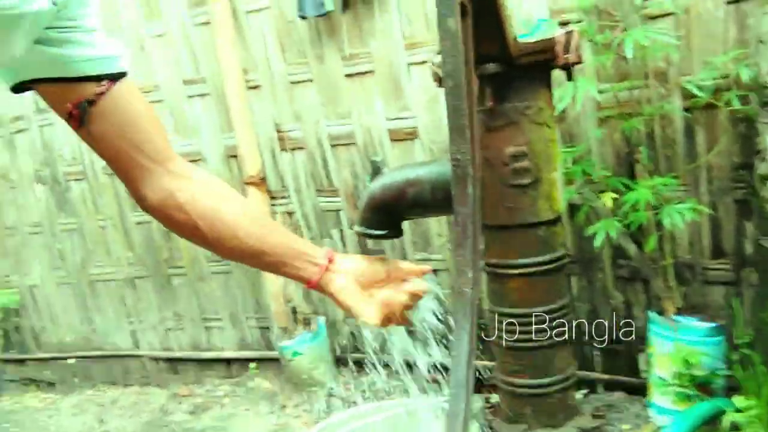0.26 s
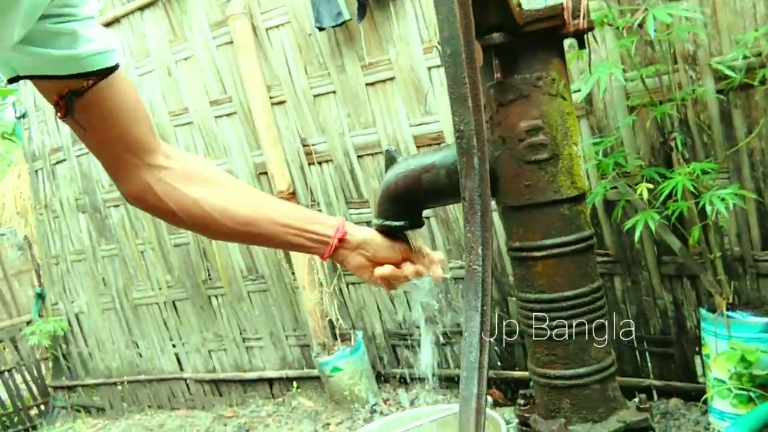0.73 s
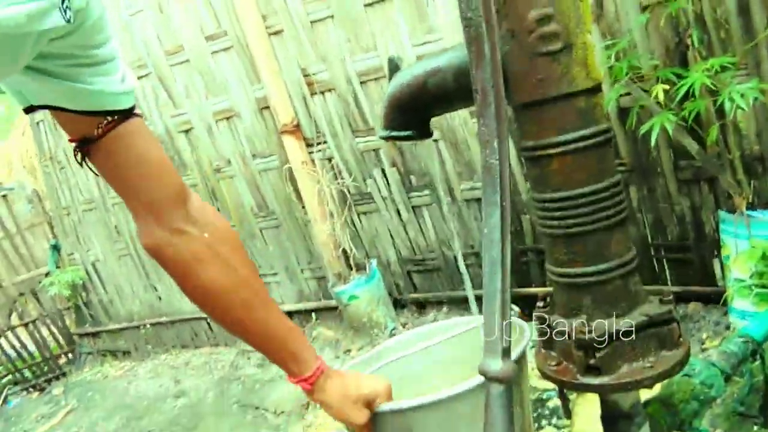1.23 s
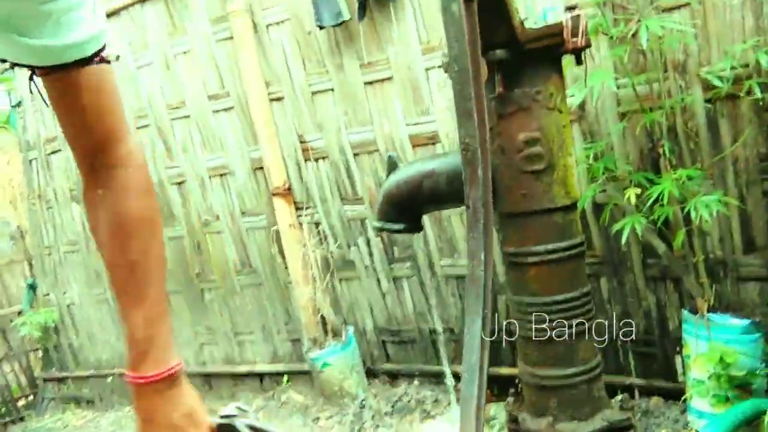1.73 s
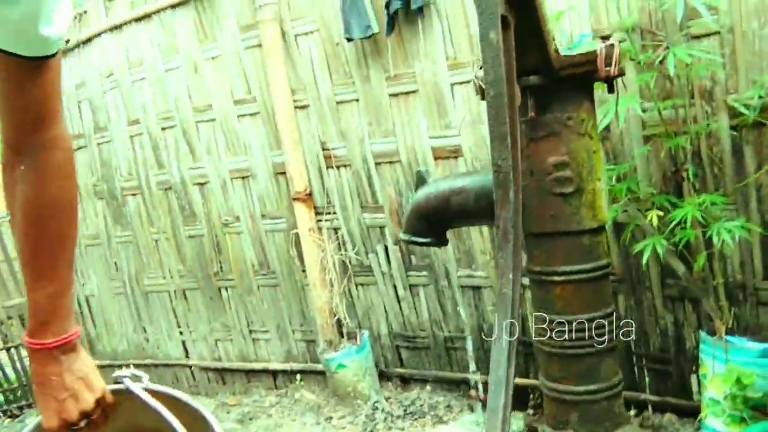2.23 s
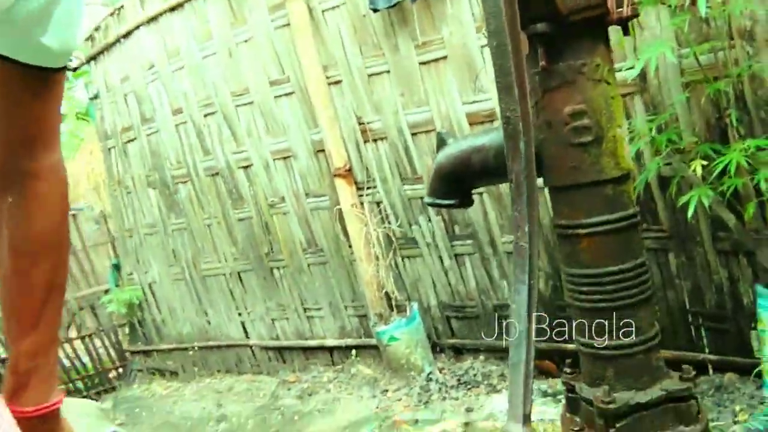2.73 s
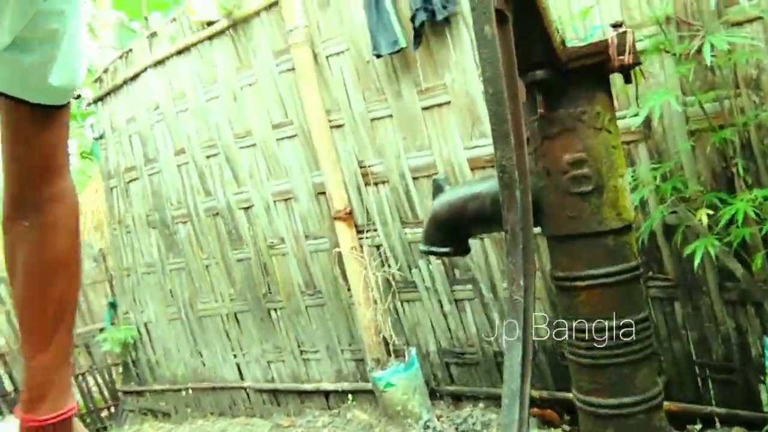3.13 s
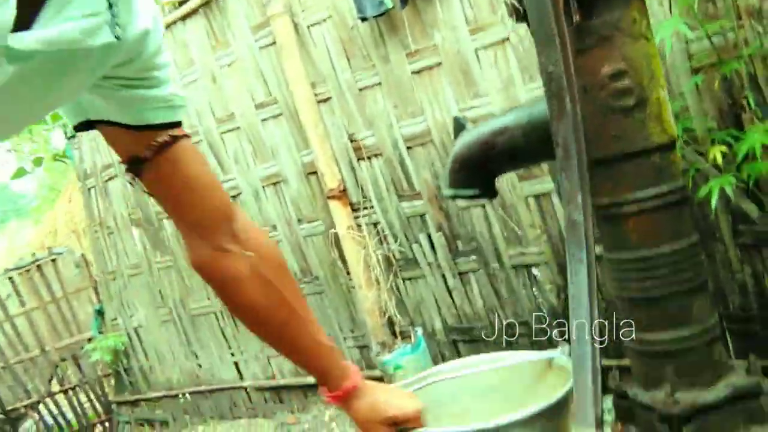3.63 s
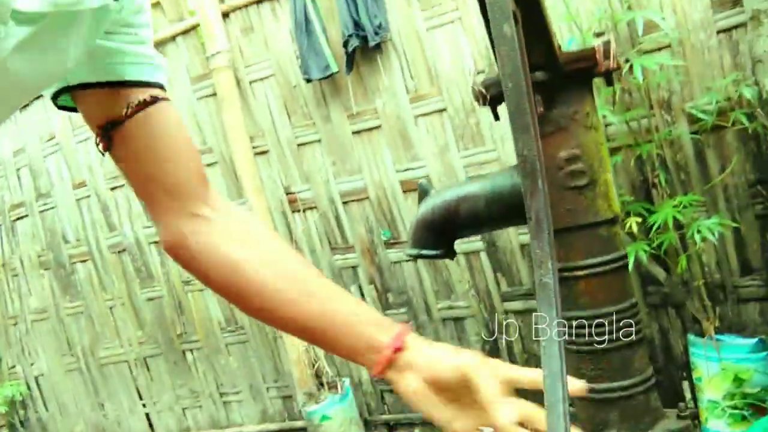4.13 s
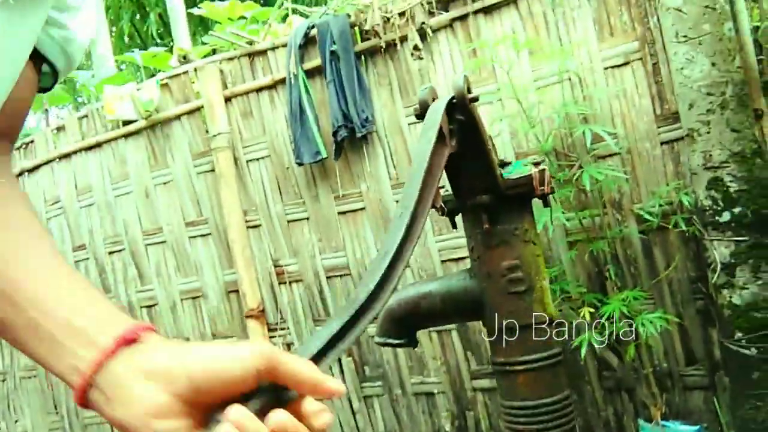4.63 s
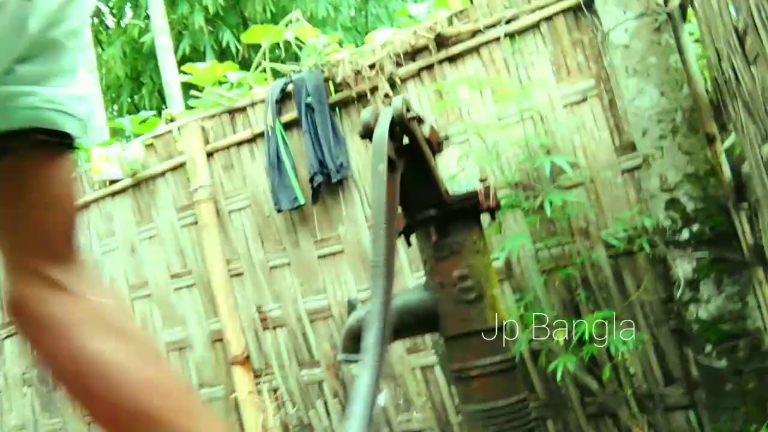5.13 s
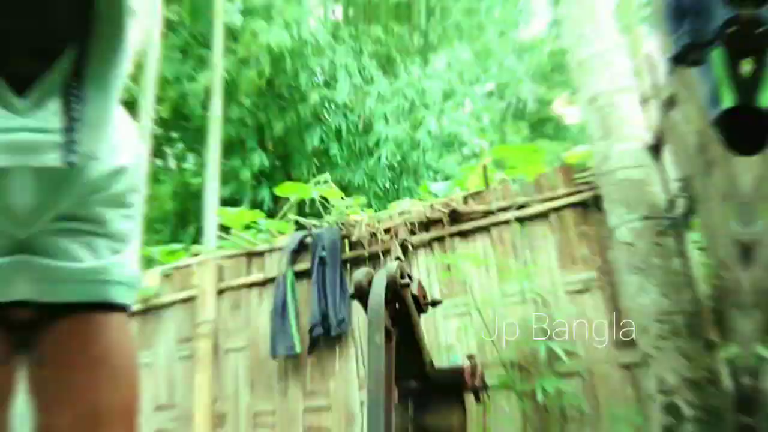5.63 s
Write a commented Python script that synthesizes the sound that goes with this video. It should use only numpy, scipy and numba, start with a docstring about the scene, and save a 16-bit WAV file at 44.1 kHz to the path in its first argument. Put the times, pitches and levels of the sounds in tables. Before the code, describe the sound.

Close up in a quiet yard, bright water splashes over a hand into a metal bucket, thins to a dribble, then is swilled and tipped out in two splashy throws. The bucket is set down with a dull thump. Loose iron clanks as a pump handle is worked, the barrel gulps with a hollow hoot, and water begins to run again.

```python
"""A yard with a cast-iron hand pump: water runs over a hand into a metal bucket, which is swilled, emptied
on the ground in two throws and set down. Then the handle is worked, the barrel gulps air and water, and
the spout starts to run again; near the end the level dips briefly. Water is a crowd of damped bubble sines,
the iron and the bucket are banks of decaying modes, and the gulps are a gliding hoot with pulsed noise.
Small drops and glugs, clouds of grains for slaps and rattle, faint reflections and yard noise join them."""
import sys
import numpy as np
from scipy import signal
from scipy.fft import rfft, irfft, next_fast_len
from scipy.io import wavfile
from numba import njit

SR = 44100
rng = np.random.default_rng(int(sys.argv[2]) if len(sys.argv) > 2 else 0)


def generate_wav(sig):
    """Save sig (samples, or channels by samples) to the path in sys.argv[1] as 16-bit PCM at SR."""
    pcm = np.round(np.clip(np.atleast_2d(sig).T, -1, 1) * 32767).astype(np.int16)
    wavfile.write(sys.argv[1], SR, pcm)


N = 258867
TIME = np.arange(N) / SR
BARREL_HZ = 386.8  # resonance of the air in the barrel


def undb(db):
    """Level to amplitude: 20 dB is a factor of ten."""
    return 10 ** (np.asarray(db) / 20)


def unit(x):
    """Normalise the mean power: scale to rms 1."""
    return x / np.sqrt(np.mean(x ** 2))


def add(out, start_s, x):
    """Superposition: mix x into out from start_s."""
    i = max(int(start_s * SR), 0)
    out[i:i + len(x)] += x[:N - i]


def colour(x, points):
    """Spectral shaping: weight x by (frequency_hz, level_db) points, joined on a log-frequency axis."""
    hz, db = np.transpose(points)
    size = next_fast_len(len(x) + 512)
    f = np.arange(size // 2 + 1) * SR / size
    gain = undb(np.interp(np.log(f + 1), np.log(hz), db))
    return irfft(rfft(x, size) * gain, size)[:len(x)]


def band(x, low_hz, high_hz, order=2):
    """Butterworth band-pass: a flat passband with smooth skirts."""
    high = min(high_hz, .48 * SR)
    low = min(low_hz, high / 2 ** (1 / 10))
    return signal.sosfilt(signal.butter(order, [low, high], "band", fs=SR, output="sos"), x)


def walk(rate_hz):
    """Slow random modulation: normal knots at rate_hz, joined by straight lines."""
    knots = rng.standard_normal(N // 20)
    return np.interp(TIME * rate_hz, np.arange(len(knots)), knots)


def envelope(t, swell_s, hold_s, sag_db_per_s, release_db_per_s):
    """Build-up and decay: swell from t = 0, hold while sagging, then die away exponentially."""
    age = t - swell_s
    sag = sag_db_per_s * np.clip(age, 0, hold_s)
    release = release_db_per_s * np.maximum(age - hold_s, 0)
    return np.clip(t / swell_s, 0, 1) * undb(-sag - release)


@njit
def bubbles(start_s, hz, cycles, size, rise):
    """Bubble resonance: damped sines that last so many cycles while their pitch rises by the fraction rise."""
    out = np.zeros(N)
    for k in range(len(start_s)):
        first, n = int(start_s[k] * SR), int(cycles[k] * SR / hz[k]) + 2
        w = 2 * np.pi * hz[k] / SR
        # a complex number turns and shrinks at each sample; glide speeds up its turning
        z, step, glide = size[k] + 0j, np.exp(1j * w - 6 / n), np.exp(1j * w * rise / n)
        for i in range(first, min(first + n, N)):
            z *= step
            step *= glide
            out[i] += z.imag
    return out


def spatter(count, cycles, spread_db, rise):
    """Random superposition: an even rain of bubbles; positive spread_db makes a few far louder."""
    when, pitch, life, loud, sign = rng.random((count, 5)).T
    hz = 250 + 16500 * pitch ** 2
    length = cycles * (.5 + life)
    # the power of hz balances the crowding of low pitches
    size = undb(-spread_db * np.log(1 - .995 * loud)) * np.sqrt(hz * np.sqrt(hz) / length)
    return unit(bubbles(when * N / SR, hz, length, size * np.sign(sign - .5), rise))


def plinks(count, low_hz, high_hz, cycles, spread_db, rise):
    """Pitched bubble resonance: sparse bubbles; small ones are commoner and ring more cycles."""
    when, pitch, life, loud = rng.random((count, 4)).T
    hz = low_hz * (high_hz / low_hz) ** np.sqrt(pitch)
    length = cycles * (.5 + life) * np.sqrt(hz / low_hz)
    size = undb(-spread_db * np.log(1 - .93 * loud)) * np.sqrt(np.sqrt(hz))
    return unit(bubbles(when * N / SR, hz, length, size, rise))


def clumps(count, decay_s, spread_db, steady):
    """Shot-noise modulation: each lump of water raises the splashing at once, then its power decays."""
    when, loud = rng.random((count, 2)).T
    kicks = np.zeros(N)
    kicks[(when * N).astype(int)] = undb(-spread_db * np.log(1 - .9 * loud))
    power = signal.lfilter([1], [1, -np.exp(-2 / (decay_s * SR))], kicks ** 2)
    return np.sqrt(abs(steady) + power / power.mean())


def flow():
    """Incoherent addition: the surges' powers sum to the gains of splash, spray, slosh and ringing pool."""
    # surges in turn: spout over the hand, thin stream, bucket swilled, two throws, set down, pump worked:
    # start_s, swell_s, hold_s, drain_db_per_s, splash_db, spray_db, slosh_db, ringing_db (against the splash)
    pour_rows = [(0, 0.0013, .13, 62, -21.5, -35.5, -40.5, -5.5),
                 (0.127, 0.041, 0.29, 80, -21.5, -35.5, -36.5, -7),
                 (0.525, 0.041, 0.2, 55, -26, -39.5, -39.5, -3.5),
                 (.88, .04, 0.18, 18.5, -33, -47.5, -57, -4), (1.07, 0.039, 0.23, 62, -38.5, -64, -42, -4),
                 (1.249, 0.019, 0.073, 148, -27, -53, -37.5, -1.5),
                 (1.594, 0.038, 0.19, 65, -37.5, -51, -40.5, -4.5),
                 (1.858, 0.026, 0.21, 97, -27, -37.5, -38.5, -9),
                 (1.999, 0.018, 0.38, 130, -22, -31, -33.5, -17),
                 (2.466, 0.036, 0.14, 49, -39.5, -45, -38.5, -5.5),
                 (2.783, .13, 0.38, 123, -21.5, -31.5, -32, -12),
                 (3.591, 0.027, 0.069, 125, -41, -49, -49, -18),
                 (3.811, 0.055, 0.059, 132, -36, -57, -37, -16),
                 (4.322, 0.033, 0.18, 107, -38, -59.5, -41, -7),
                 (4.705, .03, 0.25, 128, -37, -61, -45.5, -7), (5.092, .03, 0.13, 92, -47.5, -62, -52, -5),
                 (5.326, 0.081, 0.08, 69, -28.5, -42.5, -43.5, -5.5)]
    sag_db_per_s = 6.5  # a surge weakens while it holds
    power = 1e-18  # keeps the gain ratios finite in silence
    for start_s, swell_s, hold_s, drain, splash_db, spray_db, slosh_db, ringing_db in pour_rows:
        surge = envelope(TIME - start_s, swell_s, hold_s, sag_db_per_s, drain)
        gains = undb([splash_db, spray_db, slosh_db, splash_db + ringing_db])
        power = power + np.outer(gains, surge) ** 2
    return np.sqrt(power)


def water():
    """Bubble noise in lumps: slosh, splash and spray are the large, middle and small bubble sizes."""
    # spectrum of the splashing: frequency_hz, level_db
    splash_spectrum = [(150, -0.5), (300, -12), (500, -14), (900, -0.5), (1500, -3), (2200, 0.5), (3300, 3),
                       (5000, -0.5), (7500, -1.5), (9000, 2.5), (11000, -12.5), (15500, -22)]
    splash_gain, spray_gain, slosh_gain, pool_gain = flow()

    crackle = spatter(count=60000, cycles=4.5, spread_db=-0.5, rise=0.)
    ringing = spatter(count=12000, cycles=71, spread_db=4.0, rise=0.068)
    lumps = clumps(count=900, decay_s=0.013, spread_db=3, steady=0.32)
    grains = colour((crackle + undb(-4.5) * ringing) * lumps, splash_spectrum)
    gurgle = plinks(count=800, low_hz=260, high_hz=1500, cycles=17, spread_db=4.5, rise=.2)
    pool = plinks(count=1200, low_hz=1300, high_hz=9000, cycles=34, spread_db=5.5, rise=.1)

    gurgle_gain = .75 * np.sqrt(pool_gain / splash_gain)  # more gurgle where the water rings more
    slosh = .8 * unit(band(grains, 190, 1400, order=3)) + gurgle_gain * band(gurgle, 170, 4000)
    splash = unit(band(grains, 1312, 8380, order=6))
    spray = unit(band(grains, 10210, 16200, order=5))
    # lone droplets snap on metal and stone
    ticks = unit(band(spatter(count=500, cycles=6, spread_db=3.4, rise=0.), 6500, 16200, order=2))
    fine = spray + undb(-4) * ticks
    return slosh * slosh_gain + splash * splash_gain + pool * pool_gain + fine * spray_gain


def slaps_and_rattle():
    """Impulsive grain noise: slaps of water, and the knocked bucket's rattle, are short, dense clouds."""
    # slaps of water and rattles of the knocked bucket: start_s, level_db, centre_hz, length_s
    slap_rows = [(0.182, -20.5, 4000, 0.0098), (0.203, -12.5, 5840, 0.0061), (0.356, -20, 3900, 0.058),
                 (0.373, -6, 14000, 0.0015), (0.574, -17.5, 6600, 0.0062), (.617, -17, 3460, 0.0086),
                 (0.669, -21, 3300, 0.02), (0.72, -14, 3540, 0.0059), (0.811, -14.5, 2580, 0.0069),
                 (.848, -16.5, 4740, 0.0081), (.991, -13.5, 5470, 0.0057), (1.045, -20.5, 11500, .003),
                 (1.066, -15.5, 2200, .0076), (1.189, -22, 2950, 0.0083), (1.267, -12, 4240, 0.022),
                 (1.349, -21.5, 1600, 0.019), (1.448, -18, 6300, 0.013), (1.826, -14, 4500, 0.014),
                 (1.917, -19.5, 2930, .013), (2.021, -17.5, 7000, 0.014), (2.147, -18.5, 2480, 0.014),
                 (2.155, -9.5, 2610, 0.0062), (2.383, -13, 1520, 0.0064), (2.386, -21, 3040, 0.017),
                 (2.619, -27, 3970, 0.026), (2.908, -12, 4150, 0.0038), (3.247, -15, 2880, .015),
                 (3.360, -9, 4100, 0.028), (3.388, -18, 4000, 0.02), (3.408, -17.5, 3900, 0.0095),
                 (3.47, -24.5, 4070, 0.026), (3.604, -28, 2130, 0.017), (3.686, -18, 2480, 0.0092),
                 (3.884, -17.5, 3330, .02), (3.903, -15.5, 3650, 0.016), (3.955, -27, 12000, 0.0045),
                 (5.311, -17.5, 1870, 0.022)]
    out, t = np.zeros(N), TIME[:SR // 6]
    cloud_spectrum = [(250, -9), (700, 5.5), (1500, 6.5), (4000, 6), (8000, 7.5), (10000, -2.0), (16000, -5.0)]
    cloud = colour(spatter(count=30000, cycles=15.5, spread_db=-1.0, rise=0.017), cloud_spectrum)
    for start_s, level_db, centre_hz, length_s in slap_rows:
        i = int(start_s * SR)
        attack = 1 - np.exp(-t / 0.00097)
        shape = attack * (np.exp(-(t / length_s) ** 2.1) + 0.17 * np.exp(-t / 0.034))
        burst = band(cloud[i:i + len(t)], centre_hz / 1.45, centre_hz * 1.27, order=1) * shape
        add(out, start_s, undb(level_db) * burst * np.std(shape) / np.std(burst))
    return out


def spell(start_s, end_s, level_db, bubble_hz, count):
    """Jittered timing: small drops and bubbles of scattered size, rows of start_s, level_db, bubble_hz."""
    when, loud, pitch = rng.random((count, 3)).T
    times = start_s + (end_s - start_s) * (np.arange(count) + when) / count
    return np.transpose([times, level_db + 6 * (loud - .5), bubble_hz * 2 ** (.5 * (pitch - .5))])


def drops_and_small_glugs():
    """Bubble resonance with a noise onset: each drop or small glug is a tick and a bubble of rising pitch."""
    # single drops and small rising glugs that stand out: start_s, level_db, bubble_hz (at the start)
    drop_rows = [(1.64, -19.5, 1500), (1.693, -16, 1470), (1.742, -17.5, 1330), (1.768, -17, 1650),
                 (1.792, -21.5, 1060), (2.471, -23, 2020), (2.586, -41, 1770), (2.684, -25.5, 1960),
                 (3.548, -30, 1670), (3.59, -25.5, 1640), (3.778, -29.5, 1364), (3.816, -28, 1380),
                 (4.039, -33.5, 1010), (4.085, -31, 1410), (4.108, -31, 1360), (4.336, -28, 1420),
                 (5.22, -28, 1500), (5.263, -28, 1390), (5.295, -29, 1640), (5.708, -33.5, 1060)]
    # spells of small drops and bubbles as water is swilled or dribbles:
    # start_s, end_s, level_db, bubble_hz (the centre of the scatter)
    spell_rows = [(1.611, 1.881, -26, 1380), (2.451, 2.81, -24.5, 1520), (3.457, 3.868, -35.5, 1430)]
    tick_db = -2.5  # against the bubble's level
    out, t = np.zeros(N), TIME[:SR // 20]
    drops = np.vstack([drop_rows] + [spell(*row, count=11) for row in spell_rows])
    for start_s, level_db, hz in drops:
        tick = unit(band(rng.standard_normal(len(t)), hz / 2, hz * 2.3, order=2))
        add(out, start_s, undb(level_db + tick_db) * tick * np.exp(-t / 0.0055))
    start_s, level_db, hz = drops.T.copy()
    return out + bubbles(start_s, hz, np.full(len(hz), 28.), undb(level_db), 0.35)


def big_bubbles():
    """Large-bubble resonance: a rising pitch, mostly in the bucket, once as water hits the ground."""
    # big bubbles: start_s, pitch_hz (at the start), level_db (before the band-pass)
    bubble_rows = [(0.676, 328, -30.5), (.682, 813, -20), (0.706, 337, -33), (.772, 830, -22.5),
                   (.817, 635, -31), (.87, 674, -27.5), (1.069, 238, -29), (1.084, 400, -29),
                   (1.098, 566, -28), (1.234, 310, -28.5), (1.277, 643, -31), (1.345, 302, -28),
                   (1.357, 800, -23.5), (1.722, 616, -21.5), (1.743, 1120, -20), (2.146, 255, -32)]
    start_s, hz, level_db = np.array(bubble_rows, float).T.copy()
    return band(bubbles(start_s, hz, np.full(len(hz), 28.), undb(level_db), 0.47), 150, 2500)


def handle():
    """Modal impact: loose iron chatters at each knock, rings, grates, and shakes the air in the barrel."""
    # knocks of the handle: start_s, level_db, centre_hz, length_s (of the chatter), rod_db (against the
    # pivot), boom_db (of the barrel's air), sing_hz (the mode left singing)
    clank_rows = [(4.289, -19, 5030, 0.013, -4.5, -49.5, 4990), (4.349, -30, 5500, 0.013, -9, -47, 4840),
                  (4.369, -16, 5300, 0.027, -10, -20, 4990), (4.406, -16.5, 3820, 0.026, -5, -14, 4990),
                  (4.528, -27.5, 3120, 0.0079, -9, -24, 4480), (4.558, -18.5, 3950, 0.015, 7, -41, 4480),
                  (4.564, -13, 5060, 0.016, -6.5, -42, 4840), (4.643, -29, 3800, 0.011, -1, -50, 3806),
                  (4.654, -15.5, 6100, 0.026, -18, -28, 6308), (4.692, -11.5, 6140, 0.01, -14, -41, 4840),
                  (4.709, -15, 4000, 0.017, 3, -25, 3533), (4.783, -19.5, 3140, 0.007, -6, -10, 4690),
                  (5.074, -31, 5650, 0.025, -8, -32, 4990), (5.110, -24, 7400, 0.013, -5.5, -35, 6308),
                  (5.128, -24, 4650, 0.017, 0, -49, 4990), (5.145, -17.5, 5370, 0.031, 3, -24, 3533),
                  (5.192, -26, 3700, 0.0088, -2, -29, 2425), (5.313, -30, 3500, .032, 5, -10, 3533),
                  (5.351, -17, 4460, 0.025, 6, -44, 2753), (5.457, -18.5, 3770, 0.021, -3, -14.5, 3533)]
    # modes of the handle and its pivot: frequency_hz, level_db, t60_s
    pivot_modes = [(1543, -5, 0.086), (2166, -6.5, 0.13), (2440, -7.5, 0.16), (2977, -4.5, .1),
                   (3603, -9, 0.062), (4160, -9, 0.21), (4420, 3.5, 0.04), (4620, -4, 0.09),
                   (4790, -4.5, 0.13), (5400, -10.5, 0.16), (5900, -9.5, 0.11), (6310, 1, 0.061),
                   (7190, -4.5, 0.076), (7370, -9, 0.17), (8240, -8, 0.18), (8970, -13, 0.19),
                   (8760, -13, 0.055), (9850, -12, 0.13), (10600, -11, 0.1), (11400, -15, 0.13),
                   (12200, -18, .07)]
    # modes of the piston rod and barrel head: frequency_hz, level_db, t60_s
    rod_modes = [(1140, -0.5, 0.24), (2410, -6.5, 0.2), (2760, -4.5, 0.22), (3500, 5, 0.096),
                 (3780, -4, 0.2), (4060, -13.5, 0.072), (4630, -15, 0.12), (4940, -3, 0.25),
                 (5460, -7.5, 0.16), (5780, -8.5, 0.25), (6880, -3.5, 0.12), (7300, -14, 0.11),
                 (7600, -6, .12), (9220, -3.5, .09), (10100, -15, 0.15)]
    out, t = np.zeros(N), TIME[:SR // 3]
    hz, mode_db, t60 = np.transpose(pivot_modes + rod_modes)[:, :, None]
    is_rod = (np.arange(len(hz)) >= len(pivot_modes))[:, None]
    attack = 1 - np.exp(-t / .001)
    for start_s, level_db, centre_hz, length_s, rod_db, boom_db, sing_hz in clank_rows:
        strength, detune, phase = rng.standard_normal((3, len(hz), 1))
        # where the blow lands decides which modes speak; the load on the joint shifts them slightly
        distance_db = 4 * np.log2(hz / centre_hz) ** 2
        weight = undb(mode_db + rod_db * is_rod - distance_db + 3 * strength)
        pitch = hz * (1 + .002 * detune)
        modes = np.sin(2 * np.pi * (pitch * t + phase)) * np.exp(-np.log(1000) * t / t60)

        # chatter feeds each mode unevenly; then the parts press together and choke the ring
        chatter = unit(band(rng.standard_normal(modes.shape), 25, 220, order=1))
        growth = np.exp(np.minimum(t, length_s) / .03)
        feed = np.exp(-(t / (1.2 * length_s)) ** 4) * (growth + .45 * chatter)
        tone = (weight * modes * (.6 + feed)).sum(0)
        tone /= np.sqrt(np.mean(tone[:int(length_s * SR)] ** 2))

        contact = np.exp(-(t / length_s) ** 4) + .06 * np.exp(-t / 0.041)
        rub = band(rng.standard_normal(len(t)), centre_hz / 4.04, centre_hz * 1.37, order=2)
        grate = unit(rub) * contact
        # the one mode that the joint does not choke
        sing = undb(-7) * np.sin(2 * np.pi * sing_hz * t) * np.exp(-t / 0.023)
        iron = tone + sing + grate * undb(-9.5)

        boom = np.sin(2 * np.pi * BARREL_HZ * (1 + 0.05 * detune[0]) * t)
        boom = boom * (1 - np.exp(-(t / 0.012) ** 2)) * np.exp(-t / 0.012)
        add(out, start_s, undb(level_db) * iron * attack + undb(boom_db) * boom)
    return out


def gulp():
    """Cavity resonance: air sucked past the wet piston hoots, beats with the barrel and sputters each cycle."""
    # gulps: start_s, swell_s, hold_s, pitch_hz (at the start), glide_hz_per_s, hoot_db, sputter_db
    gulp_rows = [(4.724, 0.016, 0.016, 366, -600, -27, -29),
                 (4.79, 0.021, 0.099, 339, 1000.5, -12.5, -19.5),
                 (4.971, 0.0181, 0.0057, 465, -4200, -14, -20)]
    sag_db_per_s, release_db_per_s = 10, 801
    flood_s = 0.073  # water fills the cavity: the hoot chokes and the sputter takes over
    overtone_db = [-9, -11, -9, -14, -14]  # second harmonic upwards
    hiss_spectrum = [(400, -21.5), (1050, -0.5), (1330, -8.0), (1560, 3.5), (1850, -3), (3400, 3),
                     (5000, -6), (8000, -10.5), (10000, -28.5), (16000, -45)]
    out, t = np.zeros(N), TIME[:SR // 4]

    def waver(rate_hz):
        """Random modulation over one gulp."""
        return walk(rate_hz)[:len(t)]

    for start_s, swell_s, hold_s, start_hz, glide, hoot_db, sputter_db in gulp_rows:
        hz = start_hz + glide * np.minimum(t, swell_s + hold_s)
        phase = 2 * np.pi * np.cumsum(hz * (1 + 0.013 * waver(118))) / SR
        air = np.exp(-(t / flood_s) ** 2)
        beat = .5 * (1 - air) * np.sin(2 * np.pi * BARREL_HZ * t)
        hoot = (np.sin(phase) + beat) * air * undb(hoot_db + 2 * (2 - air) * waver(91))

        overtones = np.zeros(len(t))
        for k, db in enumerate(overtone_db, 2):
            overtones += undb(db + 3 * waver(70)) * np.sin(k * phase)
        hiss = colour(rng.standard_normal(len(t)), hiss_spectrum)
        sputter = unit(hiss * (1 + .5 * np.cos(phase))) * undb(1.3 * waver(150))
        wet = undb(sputter_db) * (1 - 0.53 * air) * (sputter + overtones)
        shape = envelope(t, swell_s, hold_s, sag_db_per_s, release_db_per_s)
        add(out, start_s, (hoot + wet) * shape)
    return out


def ring(modes, t, stretch=1):
    """Free modal vibration: one row of damped sine for each mode, its t60 multiplied by stretch."""
    hz, db, t60 = np.transpose(modes)[:, :, None]
    return undb(db) * np.sin(2 * np.pi * hz * t) * np.exp(-np.log(1000) * t / (t60 * stretch))


def bucket():
    """Damped plate modes: the wet bucket's bottom gives a dull, short boom."""
    # the bottom is bumped and set down: start_s, level_db, stretch (factor on the t60)
    thump_rows = [(3.361, -25.5, 0.32), (3.867, -12.5, 1.23), (4.051, -34.5, 1.2)]
    # modes of the bottom: frequency_hz, level_db, t60_s (before the stretch)
    bottom_modes = [(136, -1, 0.09), (214, 0, 0.044), (294, 11, 0.063), (442, -37, .04)]
    out = np.zeros(N)
    for start_s, level_db, stretch in thump_rows:
        boom = band(ring(bottom_modes, TIME[:SR // 4], stretch).sum(0), 86.4, 900)
        add(out, start_s, undb(level_db) * boom / abs(boom).max())
    return out


def murmur():
    """Noise-driven resonance: water stirring in the barrel keeps its air faintly sounding."""
    # while the piston moves: start_s, end_s, level_db
    start_s, end_s, level_db = (4.36, 5.3, -48.5)
    air = unit(band(rng.standard_normal(N), BARREL_HZ / 1.115, BARREL_HZ * 1.08, order=2))
    return undb(level_db) * air * envelope(TIME - start_s, .04, end_s - start_s, 3, 120)


def yard():
    """Shaped broadband noise: soft outdoor air that wavers a little, with a thin high hiss in it."""
    # spectrum of the quiet yard: frequency_hz, level_db
    yard_spectrum = [(25, -37.5), (50, -5.5), (120, 4), (175, -5.5), (420, -15.5), (1000, -17.5),
                     (2300, -10.5), (8300, -17), (9500, -12.5), (10300, -23), (12000, -57)]
    level_db = -49.5 + 0.92 * walk(3.4)
    return unit(colour(rng.standard_normal(N), yard_spectrum)) * undb(level_db)


def reflections(dry):
    """Diffuse reflection: convolution with decaying noise, for the ground and the woven fence."""
    t = TIME[:SR // 3]
    decay = np.exp(-np.log(1000) * t / 0.15) * (t > .005)
    echo = band(rng.standard_normal(len(t)), 220, 5800, order=1) * decay
    return signal.fftconvolve(dry, echo / np.sqrt(np.sum(echo ** 2)))[:N]


def scene():
    """Superposition of all sources, their faint reflections and the yard, under one level curve."""
    # the level is steady up to the first point, then dips briefly near the end: time_s, level_db
    level_points = [(5.72, -4), (5.75, -13.5), (5.77, -40), (5.81, -15), (5.87, -10)]
    wet_sources = water() + slaps_and_rattle() + drops_and_small_glugs() + big_bubbles()
    dry = wet_sources + handle() + gulp() + bucket() + murmur()
    mix = dry + undb(-17.0) * reflections(dry) + yard()
    point_s, point_db = np.transpose(level_points)
    return (mix * undb(np.interp(TIME, point_s, point_db)))[None]


def record(dry):
    """Saturation and band-limiting: the microphone rounds the highest peaks; the top is cut."""
    gain_db, top_hz = 1.1, 15800
    heard = np.tanh(0.85 * dry * undb(gain_db)) / 0.75
    return signal.sosfilt(signal.ellip(10, .2, 80, top_hz, fs=SR, output="sos"), heard)


dry = scene()
out = record(dry)
generate_wav(out)
```